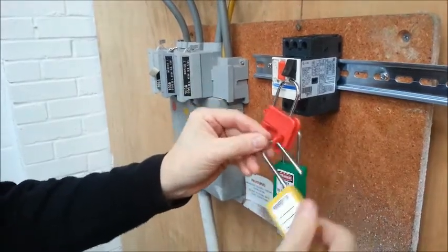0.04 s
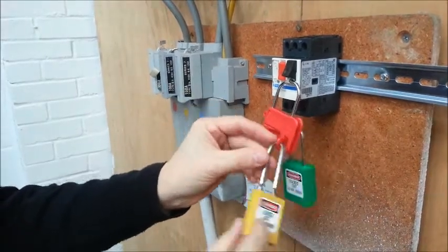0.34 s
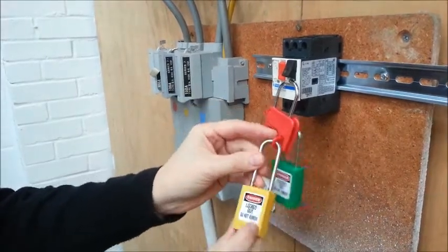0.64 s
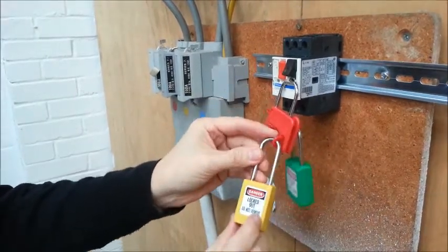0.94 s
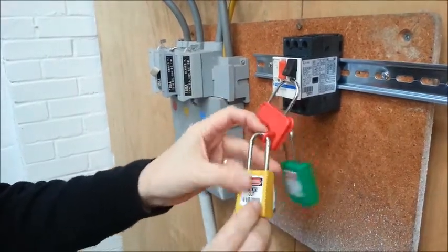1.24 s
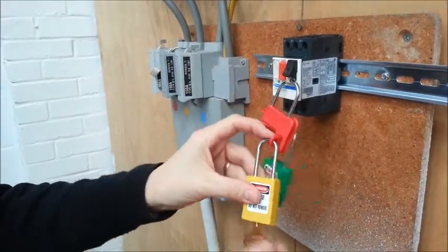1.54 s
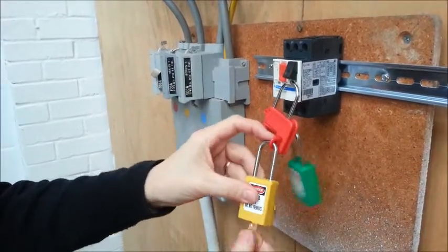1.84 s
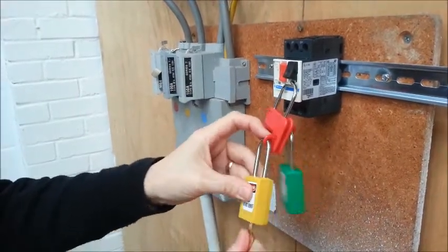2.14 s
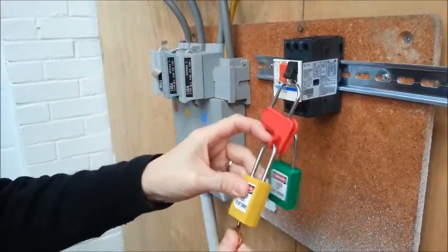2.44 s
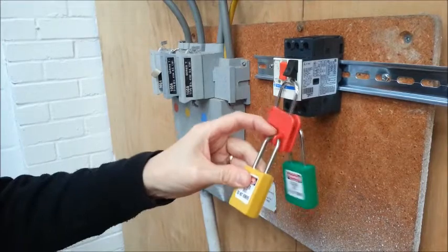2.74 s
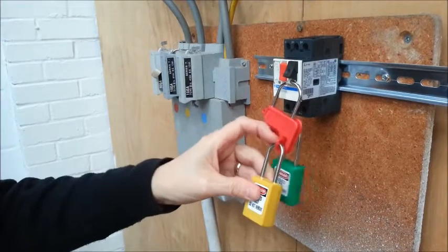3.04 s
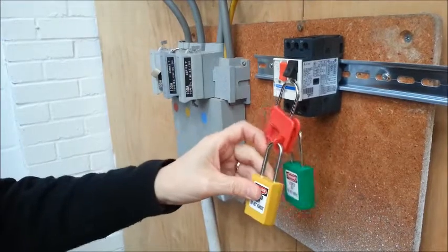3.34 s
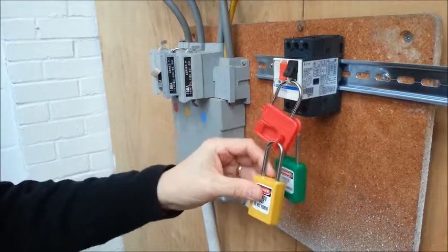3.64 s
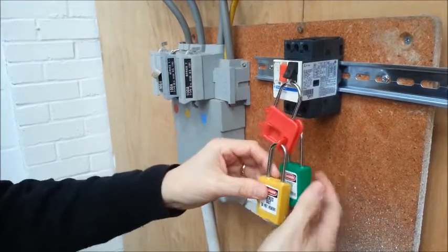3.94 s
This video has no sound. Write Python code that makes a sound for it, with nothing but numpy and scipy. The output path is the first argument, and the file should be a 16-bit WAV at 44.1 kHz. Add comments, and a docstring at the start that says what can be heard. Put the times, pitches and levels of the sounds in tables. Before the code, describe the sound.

Close up in a quiet room, a padlock shackle gives small scattered clicks. The key is pulled out with a short rasp, something knocks dully on wood, and a loud metal snap rings briefly.

```python
"""A padlock is handled in a hasp and its key drawn out; a dull knock and a sharp metal snap follow.
Close by in a quiet workshop, the shackle ticks and slides and the key rasps over its pins.
Blows are short noise bursts, friction is a train of tiny impulses; the struck body colours each.
The snap rings through the room and briefly ducks a limiter. Faint air lies underneath."""
import sys
import numpy as np
from scipy import signal
from scipy.fft import rfft, irfft
from scipy.io import wavfile
from scipy.ndimage import uniform_filter1d

SR = 44100
rng = np.random.default_rng(int(sys.argv[2]) if len(sys.argv) > 2 else 0)


def waveform_to_disk(signal):
    """Save audio, clipped to [-1, 1], as 16-bit WAV at the path in sys.argv[1]."""
    frames = np.transpose(np.atleast_2d(signal))
    scaled = np.clip(frames, -1, 1) * 32767
    samples = np.round(scaled).astype(np.int16)
    wavfile.write(sys.argv[1], SR, samples)


N = 176400

# shackle and lock clicks: start_s, level_db, low_mid_db, treble_db, left_db
SHACKLE_CLICKS = [(0.155, -44, -27, -25, -4), (0.397, -48.5, -18, -11.5, 4), (0.418, -47.5, -14.5, -13, 4),
                  (0.506, -56.5, -25, -1, 7), (0.573, -33.5, -31, -22, -3), (0.594, -29.5, -26, -18.5, 5),
                  (0.601, -19, -31.5, -19.5, 3), (0.61, -35, -41, -10, -1.0), (0.683, -39, -23, -19, 2),
                  (0.712, -45.5, -20, -21, -2), (0.75, -49, -17, -13, 1), (0.77, -28.5, -31, -17.5, -5),
                  (0.927, -14, -30, -16.5, 1), (1.08, -46, -23, 0, 6), (1.15, -22.5, -19.5, -18, 1),
                  (1.316, -43, -20, -16, 5), (1.533, -37.5, -32, -16.5, -1), (1.64, -42.5, -17.5, -7.5, 3),
                  (1.68, -42, -34, -4.5, 7), (1.82, -35, -26.5, -25, -7), (1.824, -37.5, -27, -14, 10),
                  (2.134, -40.5, -21, -12, 2.5), (2.443, -34.5, -23, -11.5, 5.5),
                  (2.482, -41.5, -19, -15.5, 2), (2.569, -37, -26, -19, 4), (3.182, -37.5, -26, -22, 0)]
# shackle sliding in the hasp: start_s, length_s, level_db
SHACKLE_SLIDES = [(0.023, 0.091, -53.5), (0.563, 0.063, -48.5), (1.66, .035, -50.5)]
# lock colour: freq_hz, gain_db
LOCK_COLOUR = [(60, -31), (200, -16), (600, -19.5), (1100, -10), (2700, -12), (4000, -4), (6000, -15.5),
               (9000, -20.5), (14500, -28.5)]
# lock resonances: freq_hz, width_hz, peak_db
LOCK_MODES = [(946, 90, 6), (1300, 79, 5.7), (1988, 450, 8.8), (3326, 240, 7.3), (3783, 330, 6.5),
              (4700, 210, 5.2), (7190, 230, 5.7), (7870, 320, 9.2), (10500, 230, 4.7)]
# key drawn over the pins: time_s, force_db
KEY_PULL = [(2.651, -60), (2.656, -35.5), (2.68, -34), (2.704, -31.5), (2.715, -38), (2.73, -34.5),
            (2.78, -36), (2.80, -40), (2.83, -44.5), (2.85, -67)]
# keyway colour: freq_hz, gain_db
KEYWAY_COLOUR = [(50, -35), (120, -6), (190, 5), (300, -12), (800, -2), (1150, -6), (1700, 0), (2900, -4.5),
                 (4300, 3.5), (5800, -5), (7800, -3), (11000, -11), (14000, -7.5)]
# pins snapping off the key: start_s, level_db
PIN_SNAPS = [(2.6577, -6), (2.6588, -7), (2.694, -17), (2.721, -24), (2.7276, -15), (2.7983, -16)]
# pin colour: freq_hz, gain_db
PIN_COLOUR = [(100, -36), (1000, -19), (1700, -2), (2600, -10), (4500, -1), (6200, -14), (7700, 4.5),
              (11000, -8.5), (14500, -5)]
# metal snap, contacts and rebounds: start_s, level_db
SNAP_BLOWS = [(3.4426, -4), (3.4454, 12.5), (3.4472, -0.5), (3.451, -1), (3.462, -2), (3.4756, -6.5),
              (3.484, -12)]
# steel colour: freq_hz, gain_db
STEEL_COLOUR = [(40, -18), (140, -19), (250, -7.5), (900, -4.5), (2300, -2), (4300, 0.5), (6000, -8.5),
                (7700, -7.5), (11500, -18.5), (14500, -15.5)]
# steel resonances: freq_hz, width_hz, peak_db
STEEL_MODES = [(244, 35, 9.5), (438, 56, 8.5), (656, 55, 8.5), (1300, 63, 8.5), (1690, 55, 4),
               (2080, 35, 2), (2224, 43, 10), (2460, 78, -0.5), (3750, 70, -0.5), (4120, 130, -7),
               (4900, 89, 4), (5600, 62, 7), (9967, 100, 7), (14100, 130, 21.5)]
# blows on wood: start_s, level_db, treble_db
WOOD_KNOCKS = [(1.353, -51, 19), (2.492, -43, 0), (2.583, -33, -2), (2.7965, -17, 14.5), (2.802, -15, -4),
               (2.821, -18, 6), (2.870, -28, 10), (3.095, -31.5, 4), (3.106, -31.5, 1), (3.3231, -5, 1),
               (3.988, -45, 21)]
# wood colour: freq_hz, gain_db
WOOD_COLOUR = [(40, -29), (120, -26), (220, -5), (600, -4), (1600, -0.5), (2400, -15), (3800, -11),
               (6000, -27), (8000, -25.5), (14500, -44)]
# wood resonances: freq_hz, width_hz, peak_db
WOOD_MODES = [(415, 53, 2), (677, 55, 8), (1340, 170, 3.5), (2060, 250, 5)]
# left-right likeness of contacts: freq_hz, correlation
CONTACT_LIKENESS = [(60, 0.99), (300, 0.89), (700, 0.57), (2000, 0.53), (6000, 0.28), (14000, .1)]
# faint opening tones: pitch_hz, level_db
FAINT_TONES = [(172.3, -74), (344.5, -65), (463.0, -70.5)]
# air colour: freq_hz, gain_db
AIR_COLOUR = [(12, -64), (20, -31), (70, -31), (160, -10.5), (310, -10.5), (347, -7), (377, -11.5),
              (753, -12.5), (914, -15.5), (1420, -17.5), (1730, -17), (1880, -17), (5850, -26.5),
              (13100, -27.5), (15000, -26)]
# air level drift: time_s, gain_db
AIR_DRIFT = [(0, -0.5), (.5, 0), (1.2, 0), (1.48, -2), (1.65, 3), (1.9, 0.5), (2.35, 1), (3.1, 2.5),
             (4, 4.5)]
# left-right likeness of air and echoes: freq_hz, correlation
ROOM_LIKENESS = [(30, .4), (130, 0.83), (300, 0.66), (600, 0.54), (1200, 0.12), (14000, 0.041)]
# room decay: freq_hz, t60_s
ROOM_DECAY = [(100, .6), (300, 0.66), (1000, 0.91), (3500, 1), (7000, 0.76), (14000, 0.34)]
# room tail colour: freq_hz, gain_db
ROOM_COLOUR = [(100, 0), (300, 2), (1000, 1.5), (3500, -0.5), (7000, -3), (14000, 2)]

CLICK_GAIN_DB, FLAT_LOW_MID_DB, FLAT_TREBLE_DB = 10, -25.5, -22  # flat: plain lock colour
AIR_DB, TONES_END_S, TONES_FADE_S = -59.5, 1.07, 0.44
TAIL_DB, TAIL_RISE_S = -16.5, 0.0084
NEAR_DB, NEAR_T60_S, NEAR_DELAY_S = -7, 0.076, 0.0037
LIMIT_DB, RECOVER_DB_PER_S = -11.5, 83
MIC_EDGE_HZ, BAND_EDGE_HZ = 14650, 16100


def shackle():
    """The shackle clicks and slides in the hasp, exciting the lock's resonances."""
    out = np.zeros((2, N))
    for start_s, level_db, low_mid_db, treble_db, left_db in SHACKLE_CLICKS:
        shelf = [(1300, low_mid_db - FLAT_LOW_MID_DB), (2400, 0.005),
                 (4800, 0), (7000, treble_db - FLAT_TREBLE_DB)]
        blow = contact(t60_s=0.019) + 1.15 * contact(t60_s=0.0052)
        click = panned(body(blow, LOCK_COLOUR, LOCK_MODES, shelf), left_db)
        add(out, start_s + 0.0011, click * amp(level_db + CLICK_GAIN_DB) / 2)
    for start_s, length_s, level_db in SHACKLE_SLIDES:
        progress = np.linspace(0, 1, round(length_s * SR))
        force = np.interp(progress, [0, 0.8, 1], [0.2, 1, 0])
        scrape = force * friction(len(force), grains_per_s=2300, spread_db=0.5)
        add(out, start_s, amp(level_db) * body(scrape, LOCK_COLOUR, LOCK_MODES))
    return out


def key():
    """The key rasps out of the lock; pins snap over its teeth."""
    force = amp(np.interp(np.arange(N) / SR, *np.transpose(KEY_PULL), left=-150, right=-150))
    rasp = force * friction(N, grains_per_s=3500, spread_db=2)
    out = body(rasp, KEYWAY_COLOUR)[:, :N]
    for start_s, level_db in PIN_SNAPS:
        add(out, start_s, amp(level_db) * body(contact(t60_s=0.012), PIN_COLOUR))
    return out


def snap():
    """Metal strikes hard, rebounds and rings."""
    blows = np.zeros((2, N))
    for start_s, level_db in SNAP_BLOWS:
        add(blows, start_s, amp(level_db) * contact(t60_s=0.025))
    return body(blows, STEEL_COLOUR, STEEL_MODES)[:, :N]


def knocks():
    """Dull blows on wood; the lows last longest."""
    out = np.zeros((2, N))
    for start_s, level_db, treble_db in WOOD_KNOCKS:
        tap = body(contact(t60_s=0.036), WOOD_COLOUR, WOOD_MODES, shelf=[(1200, 0), (2600, treble_db)])
        thud = body(contact(t60_s=0.12), WOOD_COLOUR, WOOD_MODES, shelf=[(500, 5), (2500, -16.5)])
        add(out, start_s, amp(level_db) * (tap + amp(-1.5) * thud))
    return out


def contact(t60_s):
    """One blow: a dense cluster of short vibrations, flat in spectrum, constant in energy."""
    time_s = np.arange(8192) / SR
    fade = amp(-60 * time_s / t60_s)
    spectrum = rfft(rng.standard_normal((2, len(time_s))) * fade)
    flattened = irfft(spectrum / np.sqrt(abs(spectrum) + 1e-9))
    blow = paired(flattened * np.minimum(10 * fade, 1), CONTACT_LIKENESS)
    return 2 * blow / np.sqrt((blow ** 2).sum(1, keepdims=True))


def friction(samples, grains_per_s, spread_db):
    """Stick-slip: a dense train of tiny uneven impulses."""
    strength = amp(spread_db * np.minimum(rng.exponential(1, samples), 4))
    slips = rng.random(samples) < grains_per_s / SR
    return unit_rms(paired(strength * slips * rng.standard_normal((2, samples)), CONTACT_LIKENESS))


def body(x, colour, modes=(), shelf=((1, 0), (2, 0))):
    """A resonant body as a minimum-phase filter. Shelf columns: freq_hz, gain_db."""
    freq_hz = abs(np.fft.fftfreq(8192, 1 / SR))
    modes_db = sum(peak_db / (1 + (2 * (freq_hz - mode_hz) / width_hz) ** 2)
                   for mode_hz, width_hz, peak_db in modes)
    gain = unit_rms(amp(at_freq(colour, freq_hz) + modes_db)) * amp(at_freq(shelf, freq_hz))
    response = np.exp(np.conj(signal.hilbert(np.log(gain + 1e-9))))
    ring = np.fft.ifft(response).real[:len(freq_hz) // 2]
    return signal.fftconvolve(x, ring[None], axes=1)


def room(x):
    """Quick reflections off board and wall, then the workshop's tail."""
    time_s = np.arange(SR) / SR
    freq_hz, frame_s, spectra = signal.stft(room_noise(SR), SR, nperseg=256)
    fade = amp(-60 * frame_s / at_freq(ROOM_DECAY, freq_hz)[:, None])
    colour = amp(at_freq(ROOM_COLOUR, freq_hz))[:, None]
    tail = signal.istft(spectra * fade * colour, SR, nperseg=256)[1][:, :SR]
    tail *= np.minimum(time_s / TAIL_RISE_S, 1)
    near = room_noise(SR) * (time_s > NEAR_DELAY_S) * amp(-60 * time_s / NEAR_T60_S)
    echo = amp(TAIL_DB) * tail / np.linalg.norm(tail[0]) + amp(NEAR_DB) * near / np.linalg.norm(near[0])
    return x + signal.fftconvolve(x, echo, axes=1)[:, :N]


def background():
    """Quiet room air; faint tones that die away early."""
    time_s = np.arange(N) / SR
    colour = amp(at_freq(AIR_COLOUR, np.fft.rfftfreq(N, 1 / SR)))
    air = unit_rms(irfft(rfft(room_noise(N)) * colour, N))
    air_db = AIR_DB + np.interp(time_s, *np.transpose(AIR_DRIFT))
    tones = sum(np.sqrt(2) * amp(level_db) * np.sin(2 * np.pi * (pitch_hz * time_s + rng.random()))
                for pitch_hz, level_db in FAINT_TONES)
    fade = np.clip((TONES_END_S - time_s) / TONES_FADE_S, 0, 1)
    return amp(air_db) * air + tones * fade


def room_noise(samples):
    """White noise with the room's left-right likeness."""
    return paired(rng.standard_normal((2, samples)), ROOM_LIKENESS)


def paired(x, likeness):
    """Correlates two independent channels, by frequency."""
    left, right = rfft(x)
    correlation = np.clip(at_freq(likeness, np.fft.rfftfreq(x.shape[1], 1 / SR)), -1, 1)
    angle_rad = np.arccos(correlation) / 2
    mid, side = np.cos(angle_rad) * left, np.sin(angle_rad) * right
    return irfft([mid + side, mid - side], x.shape[1])


def panned(x, left_db):
    """Sets left over right by left_db."""
    return x * amp([[left_db / 2], [-left_db / 2]])


def amp(db):
    """Decibels to gain."""
    return 10 ** (np.asarray(db) / 20)


def unit_rms(x):
    """Scales to rms 1."""
    return x / np.sqrt(np.mean(x ** 2) + 1e-20)


def at_freq(table, freq_hz):
    """Interpolates a table over log frequency."""
    points_hz, values = np.transpose(table)
    return np.interp(np.log(freq_hz + 1), np.log(points_hz + 1), values)


def add(mix, start_s, sound):
    """Mixes a sound in at start_s."""
    part = mix[:, max(round(start_s * SR), 0):][:, :sound.shape[1]]
    part += sound[:, :part.shape[1]]


def scene():
    """All the handling in the room, over the background."""
    handling = shackle() + panned(key() + knocks() + snap(), left_db=1.5)
    return room(handling) + background()


def record(dry):
    """Fast limiter with slow recovery, microphone treble edge, band limit."""
    power_db = 10 * np.log10(abs(uniform_filter1d((dry ** 2).mean(0), size=88)) + 1e-12)
    recovery_db = np.arange(N) * RECOVER_DB_PER_S / SR
    held_db = np.maximum.accumulate(power_db + recovery_db) - recovery_db
    over_db = np.maximum(held_db - LIMIT_DB, 0)
    limited = dry / amp(uniform_filter1d(over_db, size=44))
    mic_lowpass = signal.firwin(151, MIC_EDGE_HZ, fs=SR)
    band_lowpass = signal.firwin(511, BAND_EDGE_HZ, window=("kaiser", 9), fs=SR)
    softened = signal.oaconvolve(limited, mic_lowpass[None], "same")
    return signal.oaconvolve(softened, band_lowpass[None], "same")


dry = scene()
out = record(dry)
waveform_to_disk(out)
```